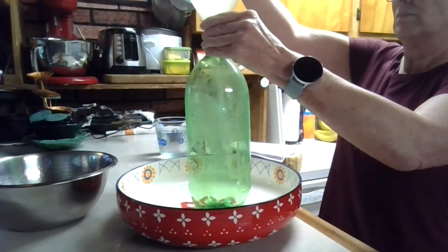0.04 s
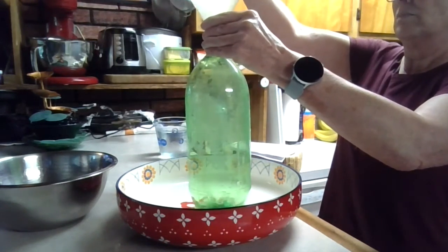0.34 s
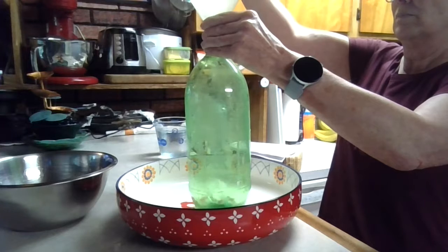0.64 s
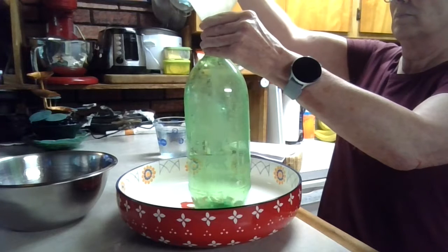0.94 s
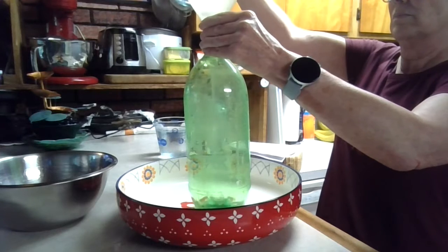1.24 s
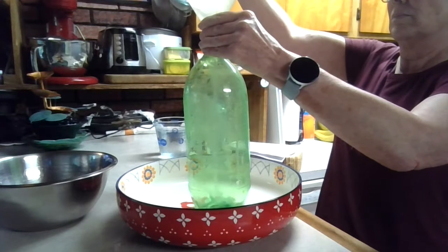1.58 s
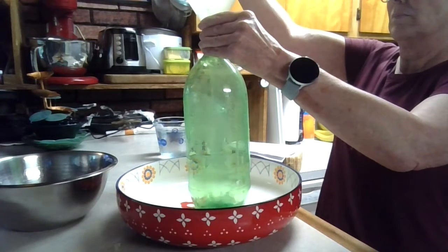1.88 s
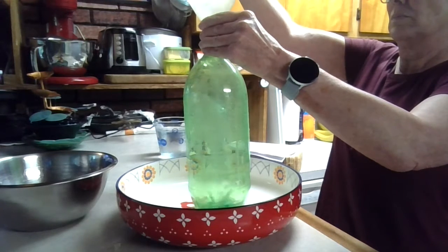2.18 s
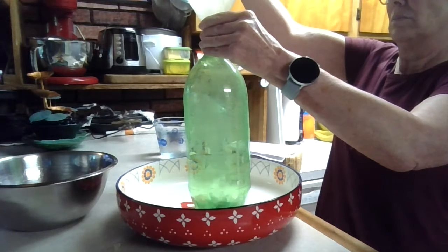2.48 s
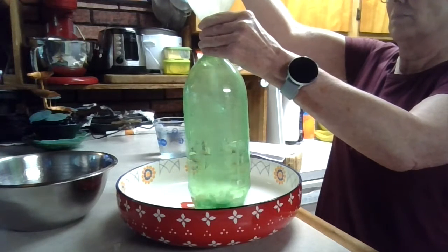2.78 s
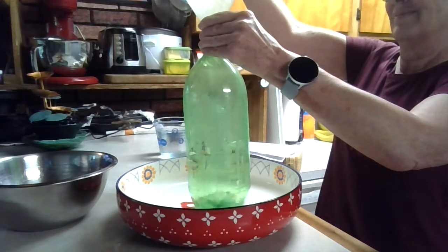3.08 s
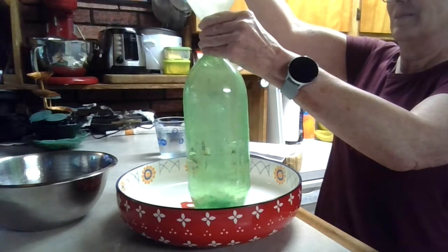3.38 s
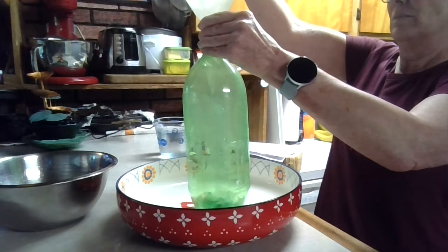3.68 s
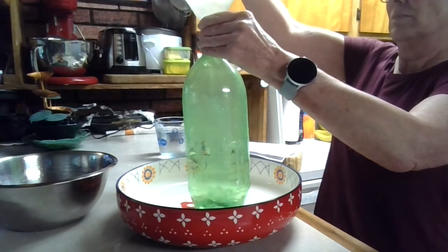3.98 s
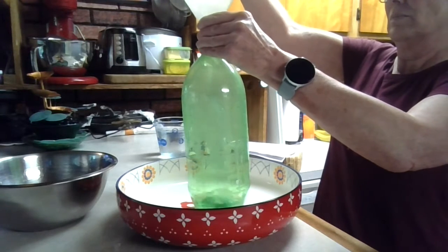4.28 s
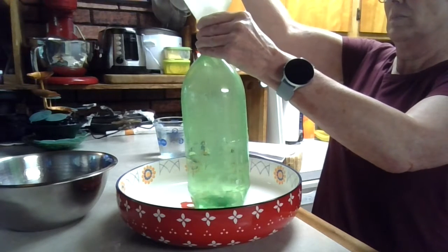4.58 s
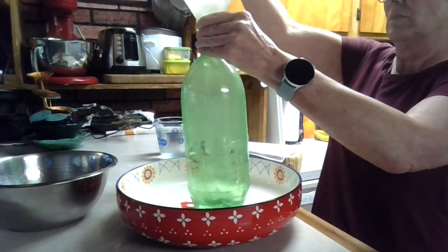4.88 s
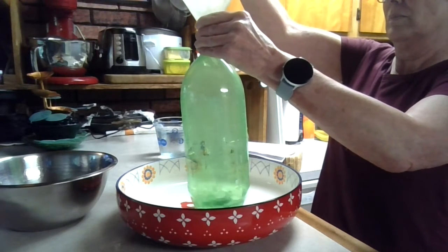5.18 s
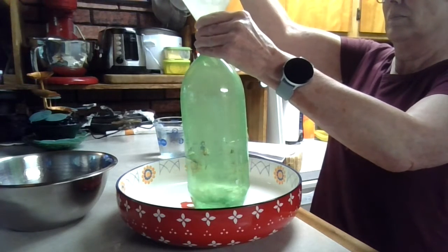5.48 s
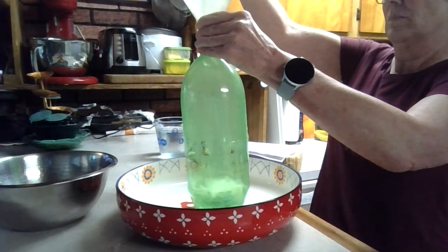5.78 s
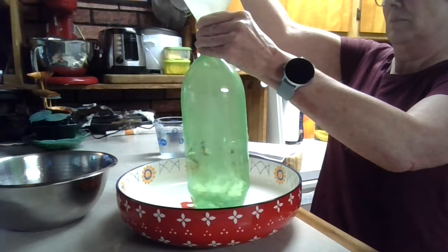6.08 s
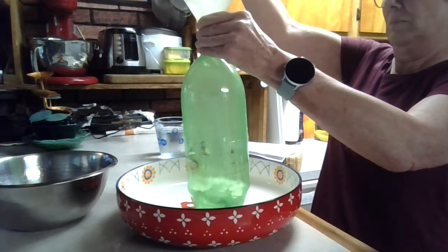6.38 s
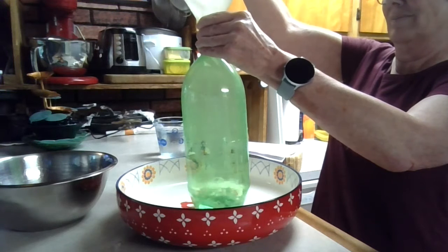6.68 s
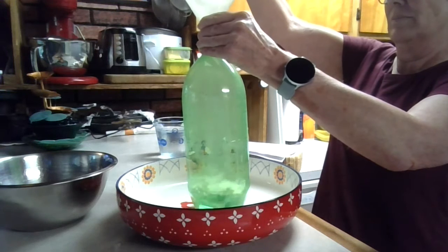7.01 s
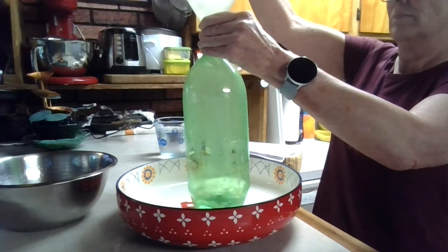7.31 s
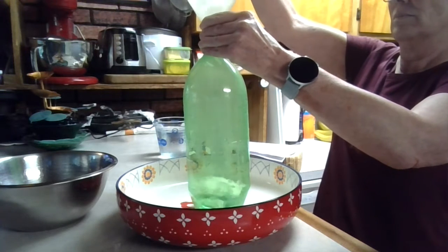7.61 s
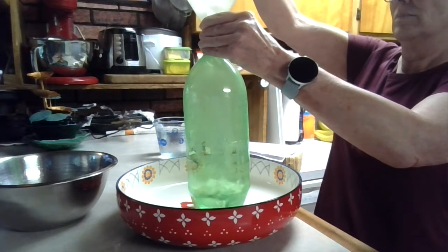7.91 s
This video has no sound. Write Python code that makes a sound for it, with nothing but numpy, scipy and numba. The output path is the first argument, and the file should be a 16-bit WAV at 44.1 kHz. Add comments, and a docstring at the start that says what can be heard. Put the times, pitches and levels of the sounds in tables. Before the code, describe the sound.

In a small, quiet kitchen, water gushes unevenly through a funnel and splashes inside a plastic bottle, with ringing bubbles, gulping gurgles and hollow plops that are loudest at the start. After nearly three seconds it thins to a soft trickle that keeps pulsing and fading, broken by occasional single drops. The sound is close, fairly dry and mono, over a faint low room hush.

```python
"""Hot water runs through a funnel into a plastic bottle on a kitchen counter, close to the microphone.
It goes down in surges, about three a second, stirring up crowds of ringing bubbles: plops sound the
air in the bottle, big bubbles gurgle, spray patters on the plastic. Then the flow thins to a pulsing
trickle with a few lone drips. The room is small and quiet; the microphone is mono and narrow-band."""
import sys
import numpy as np
from scipy import signal
from scipy.fft import rfft, irfft
from scipy.io import wavfile
from numba import njit

SR = 44100
rng = np.random.default_rng(int(sys.argv[2]) if len(sys.argv) > 2 else 0)


def wav_out(sig):
    """Save sig, one row per channel (or a flat mono array), as 16-bit PCM at SR to the path in sys.argv[1]."""
    wavfile.write(sys.argv[1], SR, np.round(np.clip(np.atleast_2d(sig).T, -1, 1) * 32767).astype(np.int16))


N = 355005
TIME = np.arange(N) / SR
FREQ = np.maximum(np.arange(N // 2 + 1) * SR / N, 1)


def undb(db):
    """Decibels to gain."""
    return 10 ** (np.asarray(db) / 20)


def unit(x):
    """Scale to an rms of one."""
    return x / np.sqrt(np.mean(x ** 2) + 1e-20)


def split(db, upper_db):
    """Share a level between a lower and an upper part that is upper_db stronger."""
    lower = db - 10 * np.log10(1 + undb(upper_db) ** 2)
    return lower, lower + upper_db


def colour(points):
    """Gain at every frequency from points of (frequency [Hz], level [dB])."""
    hz, db = np.transpose(points)
    return undb(np.interp(np.log(FREQ), np.log(hz), db))


def shaped(x, gain):
    """Filter by a gain at every frequency."""
    return irfft(rfft(x, N) * gain, N)


def band(x, low_hz, high_hz):
    """Keep the sound between two frequencies."""
    return signal.sosfilt(signal.butter(4, [low_hz, high_hz], "bandpass", fs=SR, output="sos"), x)


def low_pass(x, hz):
    """Cut steeply above a frequency."""
    return signal.sosfilt(signal.ellip(10, .2, 70, hz, fs=SR, output="sos"), x)


def swell(crest, rise, fall, attack, decay):
    """Samples, times from the crest and envelope of one event; attack and decay are flank exponents."""
    span = np.arange(max(int((crest - 5 * rise) * SR), 0), min(int((crest + 7 * fall) * SR), N))
    t = span / SR - crest
    flanks = np.where(t < 0, np.abs(t / rise) ** attack, np.abs(t / fall) ** decay)
    return span, t, np.exp(-.8 * flanks)


def at_level(x, envelope, db):
    """Put x under an envelope so that its crest has the given rms level."""
    burst = x * envelope
    return burst * undb(db) / np.sqrt(np.sum(burst ** 2) / np.sum(envelope ** 2) + 1e-20)


def chirp(hz, t, glide, seconds):
    """A sine whose pitch slides up by the share glide on either side of the crest."""
    pitch = hz * (1 + glide * np.tanh(t / seconds))
    return np.sin(rng.uniform(0, 2 * np.pi) + 2 * np.pi * np.cumsum(pitch) / SR)


@njit
def ring_bubbles(starts, hz, cycles, sizes, glide):
    """Each bubble is a damped sine whose pitch rises as it nears the surface."""
    out = np.zeros(N)
    for k in range(len(starts)):
        life = cycles[k] * SR / hz[k]
        step = np.exp(2j * np.pi * hz[k] / SR - 1 / life)
        bend = np.exp(2j * np.pi * hz[k] / SR * glide / life)
        phasor = sizes[k] + 0j
        for i in range(starts[k], min(starts[k] + int(5 * life), N)):
            out[i] += phasor.imag
            phasor *= step
            step *= bend
    return out


def bubbles(low_hz, high_hz, cycles, spread_db, glide, count):
    """A steady crowd of bubbles of all sizes, a few much louder than the rest; flat in spectrum."""
    when, pitch, life, size, sign = rng.random((count, 5)).T
    starts = (when * N).astype(np.int64)
    hz = low_hz * (high_hz / low_hz) ** pitch
    sizes = undb(-spread_db * np.log(.02 + size)) * hz * np.sign(sign - .5)
    return unit(ring_bubbles(starts, hz, cycles * (.5 + life), sizes, float(glide)))


def echoes(x, t60, wet_db, delay_s=0.0018):
    """Add a dense tail of reflections that arrives after a short delay."""
    t = TIME[:SR // 2]
    tail = rng.standard_normal(len(t)) * undb(-60 * t / t60) * (t > delay_s)
    tail /= np.sqrt(np.sum(tail ** 2))
    return x + undb(wet_db) * signal.fftconvolve(x, tail)[:N]


def room_tone(db=-71):
    """The still air of the kitchen, a low hush behind the water."""
    # spectrum of the room: (frequency [Hz], relative level [dB])
    spectrum = [(25, -20.5), (50, -9.5), (80, -1.5), (150, -6), (300, -9.5), (500, -12), (800, -18.5),
                (1200, -21), (3000, -30.5), (7000, -31)]
    return undb(db) * unit(shaped(rng.standard_normal(N), colour(spectrum)))


def thin_ring(hz=2925, width_hz=24, db=-66.5, fade_db_per_s=-5):
    """A faint, wavering ring hangs on through the lulls and slowly weakens."""
    tone = shaped(rng.standard_normal(N), 1 / (1 + ((FREQ - hz) / width_hz) ** 2))
    return unit(tone) * undb(db + fade_db_per_s * TIME)


def bottle():
    """Gain of the bottle at every frequency: its resonances stand over the direct sound."""
    # resonances of bottle and funnel: (frequency [Hz], width [Hz], level over the direct sound [dB])
    modes = [(263.9, 80, 0.5), (411.8, 110, -1.5), (1106.5, 70, 4), (1410, 25, -2), (1518, 25, 6.5),
             (1597, 45, 7), (2087, 14, -1), (2220, 29, 4.5), (2660, 26, 2), (2904, 59, 14), (3310, 17, -1),
             (3570, 38, 3), (3800, 230, 2), (4170, 60, 2.5), (4170, 65, 1.5), (5446, 77, 9.5),
             (6420, 30, 9.5), (6820, 340, 7)]
    power = sum(undb(2 * db) / (1 + (2 * (FREQ - hz) / width) ** 2) for hz, width, db in modes)
    return np.sqrt(1 + power)


def drips(glide=0.014, lag_s_per_octave=0.00099):
    """A lone drop lands with a crisp knock of short tones; the low ones crest just after the high."""
    # drops: (crest time [s], level [dB], fall [s], tones as (pitch [Hz], relative level [dB]))
    drops = [(1.467, -41, 0.0058, [(3337, 0.5), (2750, -9), (4000, 0)]), (3.882, -44.5, .006, [(1334, 1),
             (1068, 3.5), (569, -6)]), (4.98, -45, .007, [(734, -1.5), (511, -8.5), (1198, 2.5), (1940, -6),
             (2400, -5)]), (7.011, -54.5, .007, [(248, 1), (480, -0.5), (610, -0.5), (730, -4),
             (1210, -1.5), (1620, -5), (2100, -3), (2250, -5), (2900, -9), (4020, -7.5), (5480, -15),
             (5740, -18), (7140, -10.5)]), (7.645, -46.5, 0.0057, [(328, -0.5), (727, -1), (1520, -5.5),
             (1880, 0), (2450, -13.5), (3800, -5.5), (6840, -9)])]
    out = np.zeros(N)
    for crest, level_db, fall, tones in drops:
        for hz, db in tones:
            lag = lag_s_per_octave * np.log2(1500 / hz)
            span, t, envelope = swell(crest + lag, .75 * fall, fall, attack=1.25, decay=1.3)
            out[span] += at_level(chirp(hz, t, glide, fall), envelope, level_db + db)
    return out


def pips(rise_s=0.0035, fall_s=0.0091, glide=.04, gain_db=-1):
    """A lone bubble rings out from the crowd and rises in pitch."""
    # single bubbles: (crest time [s], level before gain [dB], pitch [Hz])
    lone_bubbles = [(0.065, -42, 153), (0.289, -53, 757), (0.384, -43, 907), (0.557, -35, 794),
                    (0.586, -40, 515), (0.741, -43.5, 5400), (0.746, -33, 808), (0.805, -39, 647),
                    (0.886, -46.5, 1053), (0.971, -37.5, 253), (1.002, -49, 705), (1.157, -45.5, 528),
                    (1.222, -39, 262), (1.319, -34, 1356), (1.428, -48, 522), (1.487, -39, 1022),
                    (1.773, -41, 1602), (1.811, -36, 1492), (1.814, -39.5, 406), (1.841, -38, 433),
                    (1.864, -49, 5370), (1.902, -39, 387), (1.989, -46, 524), (2.093, -37.5, 870),
                    (2.15, -35.5, 790), (2.202, -37.5, 1250), (2.262, -45, 1227), (2.333, -38.5, 614),
                    (2.564, -39, 1590), (2.929, -49.5, 1095), (3.161, -52, 816), (3.463, -54, 1103),
                    (3.513, -55, 308), (4.025, -52.5, 1090), (4.123, -49.5, 2130), (4.143, -51, 288),
                    (4.319, -56, 112), (4.85, -55, 1020), (5.027, -52.5, 492), (5.069, -56, 214),
                    (5.276, -59, 316), (5.39, -60, 290), (5.742, -55.5, 273), (6.01, -60.5, 258),
                    (6.06, -59, 189), (6.11, -60, 204), (6.198, -61, 1920), (6.473, -67.5, 2430),
                    (6.619, -58, 342), (6.673, -57, 238), (6.774, -61, 835), (7.195, -66, 3380),
                    (7.344, -55, 340), (7.573, -59.5, 379)]
    out = np.zeros(N)
    for crest, db, hz in lone_bubbles:
        span, t, envelope = swell(crest, rise_s, fall_s, attack=.91, decay=1)
        out[span] += at_level(chirp(hz, t, glide, fall_s), envelope, db + gain_db)
    return out


def sprays(body, spatter_db=-16, gain_db=-1):
    """Droplets trap tiny bubbles that ring the bottle, and spatter on the plastic as dry ticks."""
    # showers on the wall and the water: (crest time [s], level before gain [dB],
    # coarse drops' centre [Hz], fine drops' centre [Hz], fine over coarse [dB], fall [s])
    showers = [(0.02, -41, 2830, 6000, -4.5, 0.026), (0.048, -42.5, 2870, 5900, 25, 0.01),
               (0.165, -41.5, 2200, 5270, -5.5, 0.018), (0.282, -48, 2700, 6530, 10, 0.011),
               (0.354, -40.5, 2280, 4660, 9, 0.018), (0.486, -47, 2000, 6700, 18, 0.0055),
               (0.537, -37.5, 2000, 4600, 1.5, 0.011), (0.597, -51.5, 2630, 5630, 4, 0.025),
               (0.631, -56, 1500, 4040, -6, 0.01), (0.7, -60, 1920, 4200, -6, 0.021),
               (0.743, -44, 1980, 5430, 1.5, 0.0085), (0.792, -51.5, 2750, 4050, -11, 0.016),
               (0.991, -40, 2070, 5200, -2, 0.011), (1.044, -43, 1900, 4750, 0.5, 0.011),
               (1.109, -49.5, 2420, 4460, -10, 0.0082), (1.146, -51.5, 1450, 3850, -16, 0.021),
               (1.171, -45, 2420, 6200, 9.5, 0.011), (1.24, -48, 2580, 5670, 26, 0.027),
               (1.317, -39.5, 1220, 3250, -18, 0.016), (1.354, -52, 2330, 3800, 13, 0.0044),
               (1.465, -31.5, 3740, 4550, -24, 0.0032), (1.487, -40.5, 2100, 4220, 4, 0.014),
               (1.523, -47, 1940, 5600, 2, 0.02), (1.619, -42.5, 1880, 3900, -4.5, 0.018),
               (1.775, -29.5, 1320, 4800, -12.5, 0.011), (1.8, -37.5, 1430, 5160, -26, 0.015),
               (1.867, -45.5, 2770, 6070, 8, 0.023), (1.924, -41.5, 1570, 4500, -0.5, 0.018),
               (2.066, -50.5, 2410, 4800, 17, 0.0092), (2.087, -39.5, 1960, 4670, -11, 0.013),
               (2.133, -40, 2050, 4980, 1, 0.016), (2.179, -41, 1630, 3940, -7, 0.013),
               (2.27, -57, 2100, 3670, 7, 0.0074), (2.339, -39, 1680, 3900, -6.5, 0.0075),
               (2.388, -41.5, 2160, 4370, -2, 0.03), (2.561, -39.5, 2000, 5830, 1.5, 0.022),
               (2.642, -41, 1600, 3640, -2.5, 0.013), (2.664, -42.5, 1720, 3700, -17, 0.0087),
               (2.703, -41, 2100, 5660, 2.5, 0.011), (2.81, -57, 1660, 3780, -26, .009),
               (2.966, -47, 1350, 3820, -17, 0.0069), (3.098, -53.5, 1940, 5300, -25, 0.0066),
               (3.515, -63.5, 2270, 4200, 5, 0.026), (3.882, -51, 1440, 3600, -13.5, 0.0069),
               (4.119, -52.5, 2000, 5400, -3, 0.0076), (4.972, -50, 2460, 6900, 8, 0.0094),
               (4.977, -55, 2070, 4030, -25, 0.0087), (5.896, -68, 2280, 6780, 14.5, 0.012),
               (6.2, -70.5, 2405, 4690, 19, 0.014), (6.315, -59, 1466, 3920, 9, 0.0086),
               (7.012, -57, 1650, 4780, 1, 0.0076), (7.329, -74.5, 2430, 5180, 12, 0.0087),
               (7.643, -53, 1660, 4750, -5, 0.011), (7.922, -71.5, 2380, 5300, 11, 0.011),
               (8.008, -73, 2430, 4660, 11, 0.014)]
    out = np.zeros(N)
    crowd = bubbles(900, 8500, cycles=85, spread_db=4.5, glide=0.006, count=9000)
    ticks = bubbles(1800, 8500, cycles=1.5, spread_db=5, glide=0, count=14000)
    crowd = shaped(echoes(crowd, t60=.16, wet_db=9), body)
    ticks = shaped(ticks, body)
    for crest, level_db, coarse_hz, fine_hz, fine_db, fall in showers:
        span, _, envelope = swell(crest, .83 * fall, fall, attack=2.1, decay=1.3)
        low_db, high_db = split(level_db + gain_db, fine_db)
        for hz, db in (coarse_hz, low_db), (fine_hz, high_db):
            ratio = 1.26 + 0.029 * hz / 1000  # finer drops cover a wider range of pitch
            out[span] += at_level(band(crowd[span], hz / ratio, hz * ratio), envelope, db)
        out[span] += at_level(ticks[span], envelope, high_db + spatter_db)
    return out


def gulps(glide=0.081, froth_ratio=1.4, froth_db=-4, gain_db=-1):
    """A big bubble, with an overtone and a thump below, rises in pitch while it sheds a froth."""
    # air pockets breaking up in the water: (crest time [s], level before gain [dB], pitch [Hz],
    # overtone over fundamental [dB], thump over fundamental [dB], fundamental's fall [s])
    pockets = [(0.021, -28, 335, -7, -13, 0.008), (0.05, -38.5, 340.5, -8.5, -13, .012),
               (0.165, -35.5, 436, -2.5, -41, .007), (0.268, -20.5, 266.3, -18, -11.5, 0.0072),
               (0.285, -29.5, 362.7, -5.5, -12, 0.012), (0.361, -34, 383.6, -2, -28, 0.011),
               (0.437, -41, 298, -13, -14, 0.026), (0.485, -26, 315.5, -1, -15.5, .009),
               (0.742, -27.5, 302, 14, -10, 0.0075), (0.982, -27, 360.6, 6.5, -15.5, 0.011),
               (1.042, -42.5, 462, -19, -26, .018), (1.232, -31, 349.4, -0.5, -24, .014),
               (1.315, -46, 329, 8, 4.5, 0.011), (1.522, -40, 354.5, 6.5, 2.5, .008),
               (1.607, -38.5, 434, -21, -34, 0.015), (1.786, -30, 361, 13, -25, .013),
               (1.849, -47, 247, -0.5, 7, 0.025), (1.936, -40, 302.3, -37, -35, .013),
               (2.083, -34.5, 306, 15, -7, .009), (2.151, -30.5, 273.6, 14.5, -12, 0.0088),
               (2.178, -35, 292.7, 33, -6, .024), (2.361, -36, 321.4, 9, -21, 0.025),
               (2.409, -44.5, 282.5, -19, -24, 0.031), (2.563, -35.5, 335, -33, 0.5, 0.01),
               (2.582, -29, 264, -33, -10, 0.00585), (2.641, -39, 333.3, 37, 13, .016),
               (2.969, -53, 299, 19, -8, 0.022), (3.314, -53, 298.6, -8, -29, 0.017),
               (3.88, -42.5, 294, 5.5, -25, 0.0065), (4.428, -47, 273, -20, -18.5, 0.0086),
               (4.985, -50, 232.7, 14, -7, 0.012), (5.063, -54.5, 284, -28.5, -17, 0.014),
               (6.314, -42, 358, -22, -14, .01), (6.372, -52.5, 265, -17.5, -8, 0.04)]
    out = np.zeros(N)
    crowd = bubbles(41, 1500, cycles=8.2, spread_db=1.5, glide=0.13, count=7000)
    for crest, level_db, pitch, overtone_db, thump_db, length in pockets:
        low_db, high_db = split(level_db, overtone_db)
        rise = .65 * length
        fundamental = (pitch, low_db, length)
        overtone = (2.25 * pitch, high_db, length)
        thump = (.54 * pitch, low_db + thump_db, 1.4 * length)
        for hz, db, fall in fundamental, overtone, thump:
            span, t, envelope = swell(crest, rise, fall, attack=1.8, decay=1.58)
            tone = unit(chirp(hz, t, glide, rise + fall))
            froth = unit(band(crowd[span], hz / froth_ratio, hz * froth_ratio))
            out[span] += at_level(tone + undb(froth_db) * froth, envelope, db + gain_db)
    return out


def plops(glide=0.0055, froth_ratio=1.3, froth_db=-8, froth_limit_db=-43, gain_db=1):
    """The air in the bottle sings briefly as a bubble passes its pitch; froth roughens the weak notes."""
    # hollow notes of the bottle: (crest time [s], level before gain [dB], pitch [Hz], fall [s])
    notes = [(0.0204, -15, 1100, 0.0065), (0.038, -25.5, 1077, 0.0036), (0.057, -19, 1088, 0.007),
             (0.093, -34, 1110, 0.0098), (0.164, -42, 1076, .002), (0.262, -29, 1083, .0035),
             (0.272, -27, 1079, 0.0076), (0.312, -26, 1083, 0.0054), (0.4, -37, 1102, 0.0097),
             (0.458, -18.5, 1088, 0.0058), (0.481, -32, 1075, 0.0065), (0.57, -25.5, 1097, 0.0043),
             (0.74, -29, 1120, 0.004), (0.828, -39, 1102, .005), (0.971, -29, 1056, 0.0046),
             (1.073, -32, 1081, 0.006), (1.142, -37.5, 1034, .005), (1.222, -36.5, 1135, 0.0039),
             (1.317, -34, 1000, 0.0068), (1.363, -41, 1135, .005), (1.513, -36.5, 1048, .0055),
             (1.626, -37.5, 1101, .005), (1.771, -24.5, 1123, 0.002), (2.079, -28.5, 1076, 0.0042),
             (2.177, -18.5, 1098, .0038), (2.329, -29, 1069, 0.0039), (2.454, -34, 1063, 0.0038),
             (2.551, -37.5, 1084, .0035), (3.88, -38.5, 1066, 0.0048), (4.647, -45.5, 1095, 0.0042),
             (4.968, -30, 1074, 0.0046)]
    out = np.zeros(N)
    crowd = bubbles(600, 1900, cycles=6.3, spread_db=6.5, glide=0.026, count=5000)
    for crest, db, hz, fall in notes:
        span, t, envelope = swell(crest, 1.1 * fall, fall, attack=1.45, decay=1.5)
        froth = band(crowd[span], hz / froth_ratio, hz * froth_ratio)
        out[span] += at_level(chirp(hz, t, glide, fall), envelope, db + gain_db)
        out[span] += at_level(froth, envelope, min(db + froth_db, froth_limit_db))
    return out


def funnel_flow(gush_db=-48, opening_s=0.021, closing_s=0.031, drain_s=0.004, choked_db=-32):
    """Strength of churn, babble and fizz: each surge starts quickly and ends as the neck chokes."""
    # the pour, a gush that thins to a trickle: (time [s], level [dB])
    pour = [(0, -42.5), (.55, -48), (.78, -47.5), (1.15, -50), (1.36, -46.5), (1.65, -52), (1.8, -40.5),
            (2.2, -53.5), (2.68, -46.5), (2.76, -57.5), (3.75, -63), (4.1, -62), (4.7, -68.5), (5.02, -65),
            (5.15, -70), (6.35, -70), (6.75, -74.5), (7.4, -78), (7.7, -73.5)]
    # surges through the funnel: (start [s], end [s], extra churn [dB], extra fizz [dB])
    surges = [(0, 0.1, 0, -1.5), (0.267, 0.4, -18, -1.5), (0.4, 0.639, -17.5, -3), (0.762, 0.849, 0, 0),
              (0.947, 1.1, -6.5, -4), (1.236, 1.356, -3, 3), (1.491, 1.648, -10, -5.5),
              (1.787, 1.89, -2, -5), (2.072, 2.257, -3.5, -5.5), (2.331, 2.465, -4.5, -3.5),
              (2.566, 2.74, -0.5, 0), (2.767, 3.011, -2.5, 0), (3.08, 3.294, 0.5, 3),
              (3.452, 3.604, 1.5, 2.5), (3.694, 3.902, -2, 1.5), (4.019, 4.213, 2.5, 1.5),
              (4.315, 4.475, 1, 3.5), (4.622, 4.802, 4.5, 3.5), (4.956, 5.178, 0.5, 3),
              (5.197, 5.425, 5, 4), (5.583, 5.769, 3.5, 1), (5.942, 6.157, 5, -1), (6.236, 6.445, 3, 2.5),
              (6.565, 6.778, 7, 3), (6.916, 7.474, 7, 5.5), (7.535, 7.82, 7, 4), (7.948, 8.086, 2, 0)]
    # how churn, babble and fizz follow the pour: (base level at a gush [dB], slope [dB per dB])
    crowds = [(-49.5, 1), (-47.5, 1.), (-52, 1.27)]
    flow_db = np.interp(TIME, *np.transpose(pour)) - gush_db
    gate = np.full((3, N), undb(choked_db))
    for start, end, churn_db, fizz_db in surges:
        span = np.flatnonzero((TIME > start - .1) & (TIME < end + .2))
        t = TIME[span]
        release = closing_s + drain_s * undb(flow_db[span].mean())  # a strong flow drains longer
        flanks = np.maximum(start - t, 0) / opening_s + np.maximum(t - end, 0) / release
        opened = np.outer(undb([churn_db, 0, fizz_db]), np.exp(-flanks ** 1.08))
        gate[:, span] = np.maximum(gate[:, span], opened)
    return gate * undb([db + slope * flow_db for db, slope in crowds])


def stream(body, gains_db=(0, -1, -1), coarse_from_db=(-60, -57, -57)):
    """Falling water stirs up low churn, mid babble and high fizz; strong surges trap fewer bubbles."""
    # colour of the stream: (frequency [Hz], gain [dB])
    spectrum = [(30, -22), (60, -4), (110, -1.5), (200, 1), (290, 1.5), (450, 0.5), (700, 0), (850, -3.5),
                (1500, -15), (2200, -16.5), (3000, -15), (4000, -19), (5000, -20), (7000, -23)]
    gain = body * colour(spectrum)
    gentle = [band(bubbles(45, 900, cycles=7.5, spread_db=2, glide=0.029, count=1700), 25, 1300),
              band(bubbles(900, 2600, cycles=28, spread_db=2.5, glide=0.01, count=5000), 740, 3300),
              band(bubbles(2600, 7800, cycles=130, spread_db=2, glide=0.0033, count=8000), 1900, 6800)]
    coarse = [bubbles(55, 950, cycles=16, spread_db=2, glide=0.028, count=1100),
              bubbles(900, 2600, cycles=42, spread_db=5, glide=0.017, count=900),
              bubbles(2600, 7800, cycles=98, spread_db=7.5, glide=0.003, count=1700)]
    out = np.zeros(N)
    for k, strength in enumerate(funnel_flow()):
        coarse_share = strength ** 2 / (strength ** 2 + undb(coarse_from_db[k]) ** 2)
        crowd = np.sqrt(1 - coarse_share) * unit(shaped(gentle[k], gain))
        crowd += np.sqrt(coarse_share) * unit(shaped(coarse[k], gain))
        out += undb(gains_db[k]) * strength * crowd
    return out


def scene(room_delay_s=.011):
    """Close up at the counter of a small kitchen; plops and drips reach the microphone almost dry."""
    body = bottle()
    water = pips() + gulps() + sprays(body) + stream(body)
    water = echoes(water, t60=0.12, wet_db=-11.5, delay_s=room_delay_s)
    notes = echoes(plops() + drips(), t60=0.075, wet_db=-15, delay_s=room_delay_s)
    return (water + notes + room_tone() + thin_ring())[None]


def record(dry, passband_hz=7400, sampling_hz=16000, top_hz=15700):
    """A narrow-band microphone cuts the treble; a faint mirror image about its sampling rate leaks in."""
    heard = low_pass(dry, passband_hz)
    mirror = heard * 2 * np.cos(2 * np.pi * sampling_hz * TIME)
    leak = colour([(8600, -10.5), (9600, -42), (12000, -46), (15000, -60)])
    return low_pass(heard + shaped(mirror, leak), top_hz)


dry = scene()
out = record(dry)
wav_out(out)
```